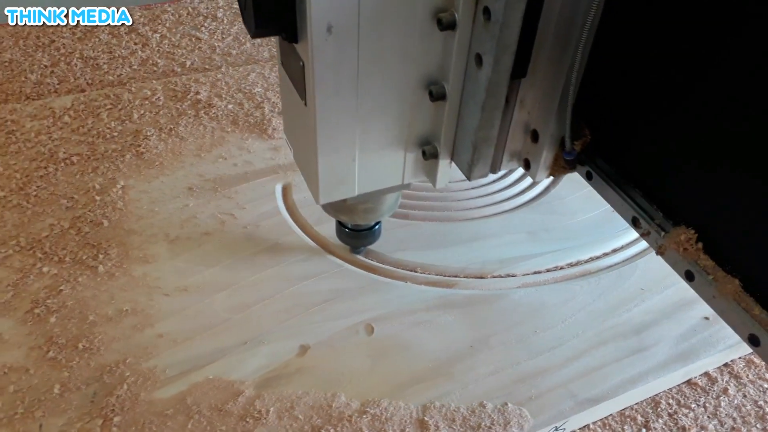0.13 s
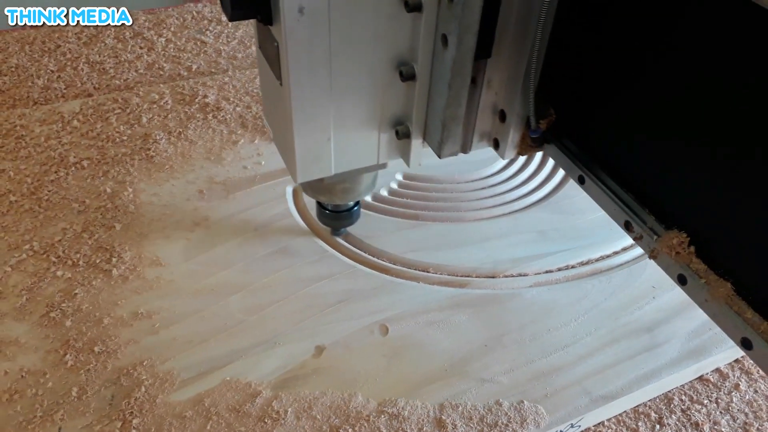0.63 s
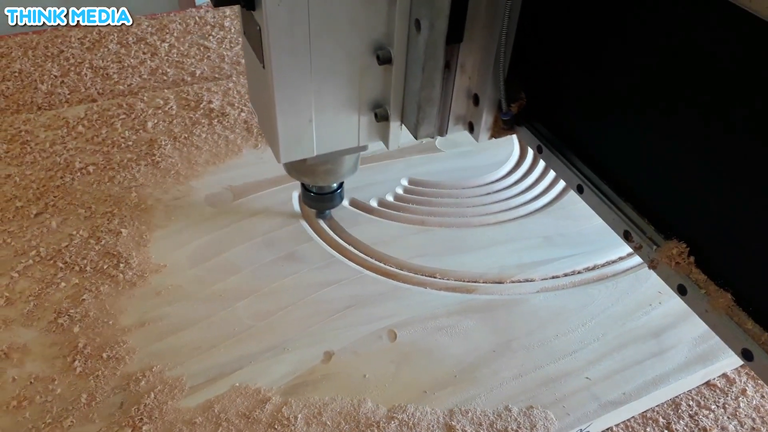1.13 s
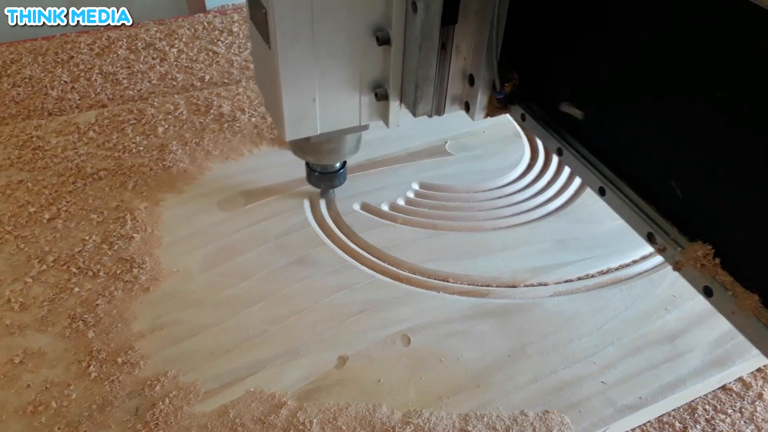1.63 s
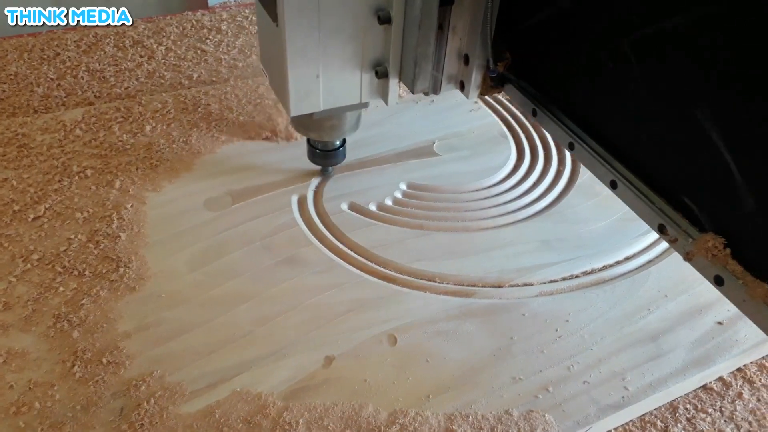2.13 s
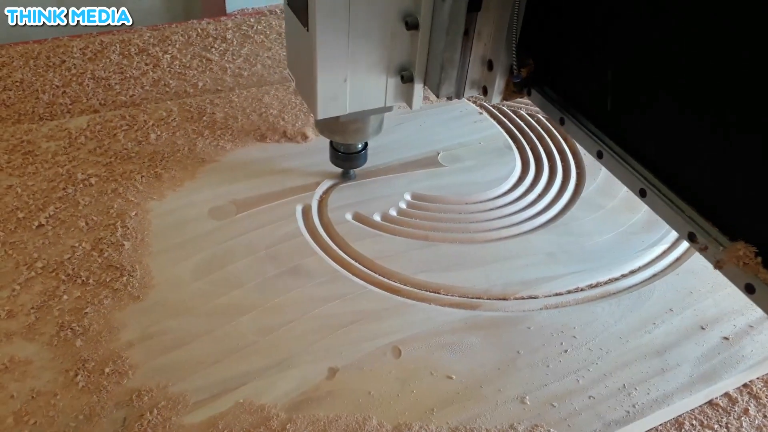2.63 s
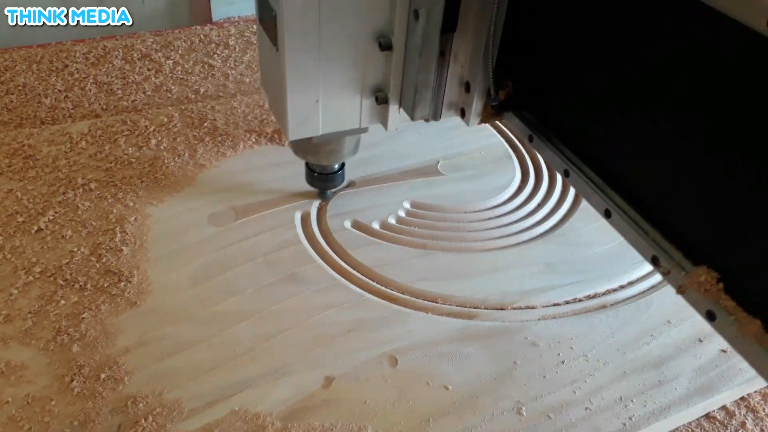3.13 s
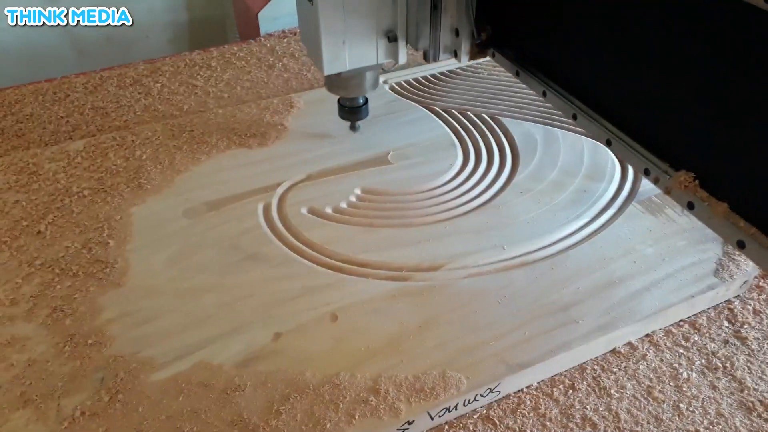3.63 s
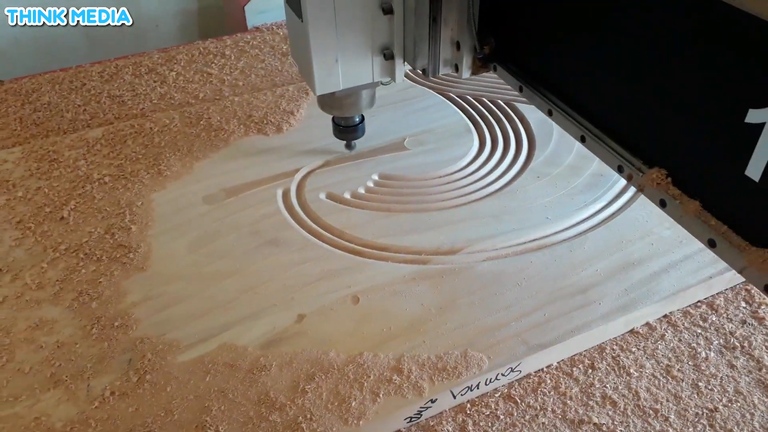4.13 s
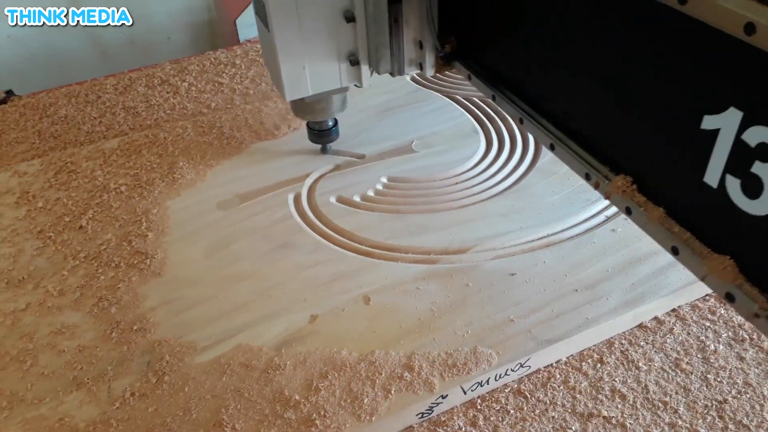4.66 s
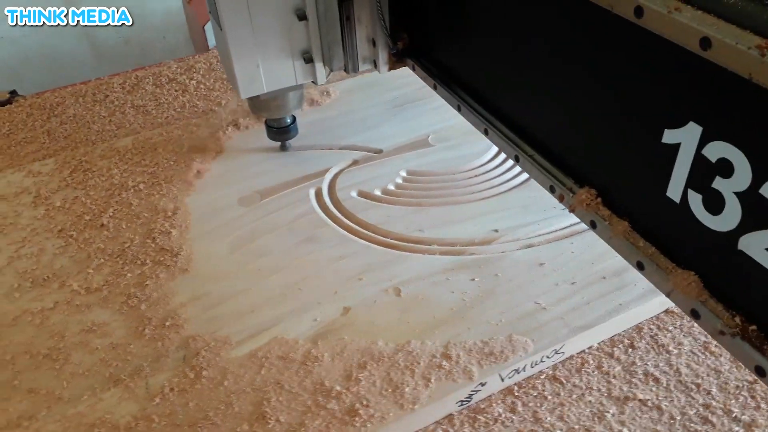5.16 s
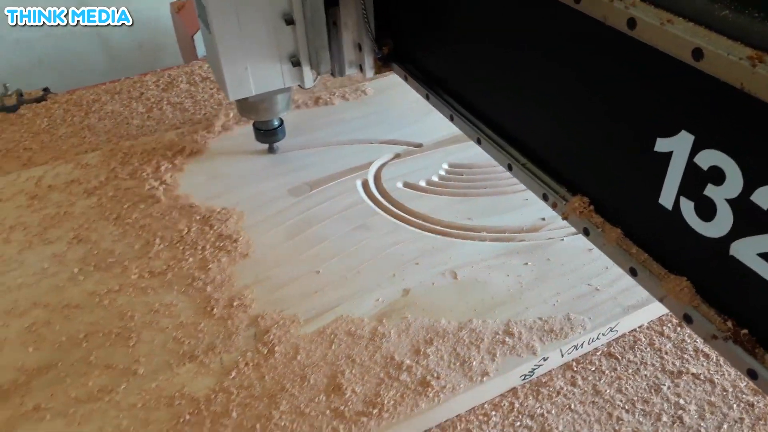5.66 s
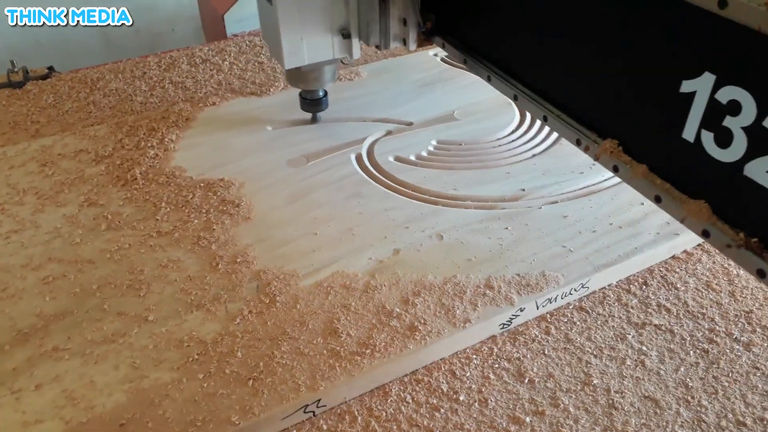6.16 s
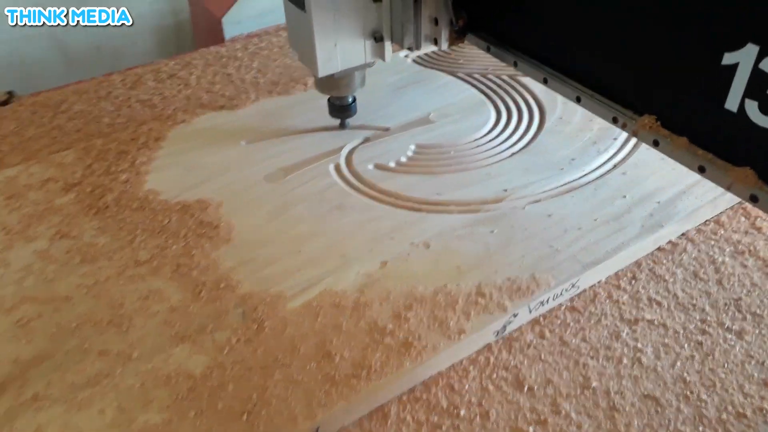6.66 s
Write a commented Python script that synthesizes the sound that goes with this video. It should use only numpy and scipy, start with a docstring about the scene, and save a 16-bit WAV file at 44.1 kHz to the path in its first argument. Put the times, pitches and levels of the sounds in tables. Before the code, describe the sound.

Close mono pickup, mildly distorted, of a high-speed cutting spindle. A piercing mid-pitched drone dominates bright air hiss and low shop rumble, flickering in level before dropping to a rougher buzz. Abruptly the view changes and the hiss swells with little cutting tone. The bit re-enters the wood with a sudden loud whine, which later sinks into wavering buzz and rising hiss.

```python
"""Router cutting a wooden panel

A router spindle turns near 300 times a second while its two-flute bit cuts grooves. Sines at whole multiples
of the shaft speed ("orders") sing over random noise for the cooling air and shop rumble, narrow noise hums
and a feed motor's thin tone. At 3.33 s the scene jumps to the lifted bit, seen from elsewhere, which then
plunges again. One microphone, lightly overloaded, hears it all; a band round the flute tone drops in steps."""
import sys
import numpy as np
from scipy import signal
from scipy.fft import rfft, irfft
from scipy.io import wavfile
from scipy.ndimage import uniform_filter1d

SR = 44100
rng = np.random.default_rng(int(sys.argv[2]) if len(sys.argv) > 2 else 0)


def persist_wave(psi):
    """Save psi, clipped to +-1, as 16-bit WAV."""
    counts = np.round(np.clip(psi, -1, 1) * 32767).astype(np.int16)
    wavfile.write(sys.argv[1], SR, np.atleast_2d(counts).T)


def ratio(d):
    """dB to gain"""
    e = np.asarray(d, float) / 20
    return 10 ** e


N = 298998
JUMP_S, PLUNGE_S = 3.33, 4.3

# colour of the air noise at the first place: (pitch [Hz], relative level per Hz [dB])
NEAR_COLOUR = [(20, -50), (40, -32), (70, -27), (120, -13), (200, -8), (330, -8), (490, -9.5), (700, -1.5),
               (1050, -10.5), (1550, -7.5), (2700, -9.5), (5000, -2.5), (8000, -7.5), (12500, -10.5),
               (15800, -14.5)]
# the same at the second place: (pitch [Hz], relative level per Hz [dB])
FAR_COLOUR = [(20, -45), (40, -24), (70, -17), (120, -8), (200, -5.5), (330, -4.5), (490, -10), (700, -1),
              (1050, -11.5), (1550, -7.5), (2700, -10.5), (5000, -1), (8000, -6.5), (12500, -10),
              (15800, -16)]
# resonances of housing and shop in that noise; lifts below zero count as none:
# (pitch [Hz], width [Hz], lift at the first place [dB], lift at the second [dB])
RESONANCES = [(234, 17, -1.5, 1), (720, 90, 1.5, 3.7), (880, 46, 1, 5.4), (1360, 150, 3.5, 1),
              (1520, 72, 4, 4.8), (1725, 40, -3, 3), (2200, 37, 4.5, 3.6), (2337, 125, 5, 5.6),
              (3000, 110, 2, 7.7), (3466, 160, 3.5, 5.4), (3950, 180, 7.5, 2.5), (4528, 224, 8, 6.6),
              (4940, 340, 6.5, 1.5), (5340, 220, 5, 6.1), (5860, 280, 4, 2.9), (6830, 340, 4, 2.1),
              (9030, 360, 2, 1.9)]
# level of the hiss, before its colour: (time [s], level [dB])
HISS = [(0, -18), (.5, -22), (1, -21), (1.3, -19.5), (2.2, -19), (2.41, -19.5), (2.44, -22.5), (2.6, -20),
        (2.9, -20), (3.325, -19), (3.335, -15.5), (3.7, -13.5), (4.0, -15.5), (4.3, -14.5), (4.4, -21),
        (4.6, -21.5), (5.05, -24.5), (5.55, -23), (5.75, -21), (6, -20.5), (6.25, -20), (6.78, -15)]
# deepest rumble, added to the hiss level: (time [s], level [dB])
DEEP_RUMBLE = [(0, 8), (.4, 1), (2.4, 1), (2.8, 4.5), (4.2, 2), (4.7, -1.5), (6.78, 1)]
# rough hums against the hiss level:
# (pitch [Hz], width [Hz], first cut [dB], bit lifted [dB], second cut [dB])
DRONES = [(243.6, 7.7, -40, -22.5, -37), (394, 40, -27, -29, -36), (718, 22, -26, -22, -29),
          (852, 40, -23, -25, -28), (2045, 33, -20, -25, -32), (3113, 34, -34, -24, -25),
          (3966, 35, -21, -19, -18), (4425, 52, -20, -15, -34), (4533, 52, -27, -18, -25),
          (4970, 40, -25, -21, -32), (5264, 110, -24, -9.5, -22), (5410, 70, -34, -21, -16.5),
          (5800, 36, -27, -27, -22), (7150, 24, -35, -22, -30), (9330, 63, -37, -20, -36),
          (9800, 50, -45, -34, -37)]
# the feed motor's thin tone: (time [s], rms level [dB])
FEED = [(0, -31), (.3, -37), (.6, -33), (1.2, -37.5), (1.5, -31), (1.7, -38), (2.4, -50)]
# the spindle speed sags under load: (time [s], speed [turns per second])
SHAFT = [(0.0, 298.0), (2.3, 298.08), (2.55, 298.98), (2.8, 299.33), (3.33, 299.4), (3.34, 299.8),
         (4.2, 299.8), (4.4, 298.02), (4.6, 298.7), (5.6, 298.4), (5.9, 299.06), (6.78, 299.05)]
# order 1, the shaft's unbalance: (time [s], rms level [dB])
UNBALANCE = [(0, -22.5), (.25, -23.5), (.8, -32), (1.15, -48), (1.45, -33.5), (2, -28.5), (2.3, -22),
             (2.62, -26), (2.85, -31.5), (3.3, -30.5), (4.17, -33), (4.2, -24.5), (4.31, -19), (4.35, -34),
             (4.45, -31), (4.5, -23), (4.54, -28), (4.6, -21), (4.655, -34), (4.7, -26), (4.85, -22.5),
             (5.35, -22.5), (5.68, -19), (5.8, -31.5), (6.05, -31.5), (6.55, -23.5), (6.78, -26)]
# order 2, one stroke a flute, which the panel radiates best: (time [s], rms level [dB])
FLUTES = [(0, -10.5), (.3, -7.5), (.68, -6.5), (1.75, -7), (1.95, -5.5), (2.4, -5), (2.54, -8.5),
          (2.67, -19), (2.9, -21), (2.97, -17.5), (3.325, -18), (3.335, -30), (3.43, -29), (3.5, -23),
          (3.58, -27), (3.66, -23), (3.85, -30), (4.17, -36), (4.19, -24), (4.25, -20), (4.31, -15.5),
          (4.345, -8), (4.39, -8.5), (4.42, -6), (4.97, -6.5), (5.28, -9), (5.62, -10), (5.72, -17),
          (5.78, -17.5), (5.84, -25), (5.9, -19.5), (6.14, -26), (6.4, -19.5), (6.55, -18), (6.62, -22),
          (6.7, -18.5)]
# order 4, first overtone of the flute tone: (time [s], rms level [dB])
OVERTONE = [(0, -20), (.2, -19), (.5, -22.5), (.8, -20.5), (1.25, -24), (1.58, -22.5), (1.66, -33),
            (1.9, -28), (2, -23.5), (2.15, -20), (2.55, -30.5), (2.6, -17), (3.1, -16.5), (3.325, -22.5),
            (3.335, -59), (4.2, -52), (4.26, -23), (4.3, -45), (4.33, -27.5), (4.5, -32), (4.58, -45),
            (4.65, -34), (4.7, -40), (5, -34.5), (5.6, -26), (5.75, -29.5), (5.9, -23), (6.15, -30),
            (6.35, -24.5), (6.6, -25), (6.7, -41), (6.78, -25)]
# order 6, second overtone of the flute tone: (time [s], rms level [dB])
SIXTH = [(0, -35), (1.55, -35.5), (1.66, -27.5), (1.85, -41), (2, -26), (2.15, -33), (2.43, -29),
         (2.55, -36), (2.61, -24.5), (2.75, -22.5), (3.05, -21), (3.325, -27), (3.335, -47), (4.2, -47),
         (4.33, -40), (4.85, -42), (5.12, -32), (5.32, -36), (5.6, -30), (5.7, -38), (5.82, -24),
         (5.92, -24), (6.2, -32), (6.35, -27), (6.55, -31), (6.7, -17.5), (6.78, -23)]
# the weaker orders take on a new colour at each new stretch of panel, before the lift of BITE:
# (start [s], rms levels of orders 3, 5, 7, 8, 9, 10, 11, 12 [dB])
STRETCHES = [(0, [-35, -30.5, -32, -40, -47, -35.5, -45, -35]),
             (.7, [-37, -29, -36, -42, -50, -44, -50, -41]),
             (1.36, [-26.5, -32, -38.5, -39, -40, -41, -40, -41]),
             (1.62, [-27, -26.5, -27, -31, -38, -39.5, -48, -36]),
             (2.1, [-25.5, -27.5, -45, -35, -37, -34, -48, -37]),
             (2.4, [-30, -34, -45, -32, -47, -40, -50, -42]),
             (2.59, [-34, -32, -29.5, -27.5, -28.5, -33, -38, -35]),
             (2.84, [-36, -34.5, -32.5, -25, -30, -43, -33, -27]),
             (3.33, [-50, -50, -49, -51, -54, -38, -48, -48]),
             (4.22, [-36, -38, -44, -43, -42, -39, -46, -44]),
             (4.45, [-34, -45, -36, -48, -56, -44, -44, -48]),
             (4.75, [-33, -37.5, -29, -39, -42, -48, -36, -42]),
             (5.2, [-29.5, -30.5, -31, -46, -41, -37.5, -48, -44]),
             (5.75, [-31, -40.5, -39.5, -38, -37.5, -40, -40, -52]),
             (6.26, [-29.5, -35.5, -32, -27.5, -48, -35, -36, -36]),
             (6.64, [-27, -26, -26, -25, -35, -34, -35, -33])]
# changes of colour where the bit meets an edge: time [s]
EDGE_CHANGES = [1.62, 2.59, 5.75]
# the weaker orders rise together as the bit bites harder: (time [s], lift [dB])
BITE = [(0, 1), (.4, -6), (.8, 2), (1.15, -5), (1.45, 3.5), (1.6, -1), (2.0, 0), (2.3, -1), (2.55, -3),
        (2.7, -2.5), (3.05, 0.5), (3.3, 0.5), (4.3, 2), (4.5, -3), (4.9, -0.5), (5.2, -3), (5.55, 1.5),
        (5.71, -4.5), (5.9, 2), (6.2, 2.5), (6.5, 1.5), (6.78, 0)]
# two orders that the housing lifts: (time [s], rms level of order 18 [dB], of order 24 [dB])
WHINE = [(0, -40, -45), (.9, -44, -34), (1.3, -30, -43), (1.6, -39, -50), (2.9, -30.5, -41),
         (3.325, -34, -46), (3.335, -44, -36), (4.2, -47, -46.5), (4.5, -46, -52), (5.6, -52, -52),
         (6.05, -29, -38), (6.35, -26.5, -41), (6.6, -26, -35), (6.78, -30, -33)]
# high orders that follow order 12: (order [number], level against order 12 [dB])
FOLLOW_12 = [(13, -2.5), (14, -0.5), (15, -13), (16, -5), (17, -9), (19, -12)]
# orders that follow order 18: (order [number], level against order 18 [dB])
FOLLOW_18 = [(20, -7), (22, -9)]
# three sizes of sudden drop in the band round the flute tone: (depth at the middle [dB], half width [Hz],
# lean of the click towards low pitch [ratio], upper, lower side tone against what is taken away [dB])
STEPS = [(-4, 66, 3, -13, -23), (-6, 160, -0.8, -28, -37), (-20.5, 110, -1.7, -47, -31)]
# when the band drops: (start [s], end [s], row of STEPS [number])
DIPS = [(.690, .736, 0), (.772, 2.418, 0), (1.205, 1.213, 1), (1.233, 1.259, 2), (1.332, 1.589, 2),
        (1.944, 2.007, 2), (2.015, 2.024, 1), (2.035, 2.043, 2), (2.094, 2.102, 2)]


def evened(x):
    """Scales a signal to rms 1."""
    return x / np.sqrt(np.mean(x ** 2) + 1e-20)


def read_colour(points, hz):
    """Reads a colour table along a logarithmic pitch axis."""
    f, level_db = np.transpose(points)
    return np.interp(np.log(hz + 1), np.log(f + 1), level_db)


def follow(table, t):
    """Reads each column of a time table at the times t."""
    times, *values = np.transpose(table)
    return [np.interp(t, times, column) for column in values]


def wobble(count, width_hz):
    """Makes rows of slow random motion, rms 1, by smoothing random steps."""
    step = 64  # samples
    keep = np.exp(-2 * np.pi * width_hz * step / SR)
    slow = signal.lfilter([1], [1, -keep], rng.standard_normal((count, N // step + 2)))
    return [np.interp(np.arange(N) / step, np.arange(len(row)), evened(row)) for row in slow]


def air_levels(t, hz):
    """The low roar and the top follow the hiss only in part; the deepest rumble has its own course."""
    [hiss_db], [rumble_db] = follow(HISS, t), follow(DEEP_RUMBLE, t)
    above_usual_db = hiss_db + 20  # the usual hiss is -20 dB
    roar_db = 1.86 - 0.53 * above_usual_db
    top_db = -3.5 - 0.3 * above_usual_db
    field_db = hiss_db + rumble_db / (1 + (hz / 180) ** 4)
    field_db = field_db + roar_db / (1 + (hz / 1800) ** 2)
    return field_db + top_db / (1 + (9000 / (hz + 1)) ** 4)


def air(patchy_db=0.5, ripple_db=1.9, gust_db=0.5, throb_db=0.48, throb_hz=28.6):
    """Cooling air and rumble: coloured noise with patches, and ripples, gusts and a throb in the treble."""
    size, overlap, hop = 512, 384, 128  # samples
    frames, hz = N // hop + 5, np.fft.rfftfreq(size, 1 / SR)[:, None]
    a, b, patches, ripples = rng.standard_normal((frames, 257, 4)).T
    t = np.arange(frames) * hop / SR
    patches = evened(uniform_filter1d(uniform_filter1d(patches, size=6, axis=0), size=20, axis=1))
    # fine random ripples across the treble, drifting slowly
    ripples = evened(uniform_filter1d(uniform_filter1d(ripples, size=2, axis=0), size=250, axis=1))
    gusts = evened(uniform_filter1d(rng.standard_normal(frames), size=8))
    throb = np.sin(2 * np.pi * throb_hz * t) + .7 * np.sin(4 * np.pi * throb_hz * t)
    treble = hz / (hz + 4000)
    field_db = air_levels(t, hz) + patchy_db * patches
    field_db = field_db + treble * (ripple_db * ripples + gust_db * gusts + throb_db * throb)

    noise = evened(signal.istft(a + 1j * b, nperseg=size, noverlap=overlap)[1])
    spectra = signal.stft(noise, nperseg=size, noverlap=overlap)[2][:, :frames]
    shaped = signal.istft(spectra * ratio(field_db), nperseg=size, noverlap=overlap)[1][:N]

    fine_hz = np.fft.rfftfreq(N, 1 / SR)
    rings_db = 0
    for f, width_hz, *lifts_db in RESONANCES:
        peak = 1 / (1 + (2 * (fine_hz - f) / width_hz) ** 2)
        rings_db = rings_db + np.outer(np.maximum(lifts_db, 0), peak)
    places = []
    for colour, ring_db in zip((NEAR_COLOUR, FAR_COLOUR), rings_db):
        gain = ratio(read_colour(colour, fine_hz) + ring_db + 7.5)
        places.append(irfft(rfft(shaped) * gain, N))
    return np.where(np.arange(N) < JUMP_S * SR, *places)


def drones():
    """Narrow bands of noise: hollow parts of the machine and shop hum roughly on their own pitch."""
    t, hz = np.arange(N) / SR, np.fft.rfftfreq(N, 1 / SR)
    [hiss_db] = follow(HISS, t)
    stage_times = [JUMP_S, JUMP_S, PLUNGE_S, PLUNGE_S + 0.18]
    out = np.zeros(N)
    for f, width_hz, first_db, lifted_db, second_db in DRONES:
        peak = 1 / (1 + (2 * (hz - f) / width_hz) ** 2)
        band = evened(irfft(rfft(rng.standard_normal(N)) * peak, N))
        stage_db = np.interp(t, stage_times, [first_db, lifted_db, lifted_db, second_db])
        out += ratio(hiss_db + stage_db) * band
    return out


def feed(hz=1278.5):
    """The feed motor: one sine of steady pitch whose level follows FEED and stops at its end."""
    t = np.arange(N) / SR
    [level_db] = follow(FEED, t)
    running = t < FEED[-1][0]
    return np.sqrt(2) * ratio(level_db) * running * np.sin(2 * np.pi * hz * t)


def upper_orders(t):
    """Each stretch's colour blends into the next (almost at once at the jump), all lifted by the bite."""
    blend_s, edge_blend_s = 0.23, 0.055
    starts = np.array([s for s, _ in STRETCHES[1:]])
    at_edge = abs(starts[:, None] - np.array(EDGE_CHANGES)).min(axis=1) < .04
    usual_s = np.minimum(blend_s, np.diff(starts, prepend=0))
    half_s = np.where(at_edge, edge_blend_s, usual_s) / 2
    half_s[abs(starts - JUMP_S) < .04] = .005
    # each blend has a start and an end, so each colour is held between two corners
    corners = np.ravel([starts - half_s, starts + half_s], "F")
    colours = np.repeat([db for _, db in STRETCHES], 2, axis=0)[1:-1]
    [bite_db] = follow(BITE, t)
    return [np.interp(t, corners, db) + bite_db for db in colours.T]


def cutter(shake_db=1.0, shake_rad=0.041):
    """Shaft orders as sines; uneven wood shakes each one's level and phase, the high ones more.

    The two shakes are rms values for order 4."""
    t = np.arange(N) / SR
    upper, whine = upper_orders(t), follow(WHINE, t)
    levels = [follow(table, t)[0] for table in (UNBALANCE, FLUTES, OVERTONE, SIXTH)]
    levels += upper + whine
    levels += [upper[-1] + db for _, db in FOLLOW_12]
    levels += [whine[0] + db for _, db in FOLLOW_18]
    orders = [1, 2, 4, 6, 3, 5, *range(7, 13), 18, 24]  # same sequence as the levels
    orders += [round(k) for k, _ in [*FOLLOW_12, *FOLLOW_18]]

    turn = 2 * np.pi * np.cumsum(follow(SHAFT, t)[0]) / SR  # shaft angle in radians
    level_shakes = wobble(count=len(orders), width_hz=9.0)
    phase_shakes = wobble(count=len(orders), width_hz=5)
    starts = rng.random(len(orders))
    out = np.zeros(N)
    for k, db, level_shake, phase_shake, start in zip(orders, levels, level_shakes, phase_shakes, starts):
        loose = .3 if k == 2 else np.sqrt(k / 4)  # the flute tone is the steadiest
        phase = k * turn + loose * shake_rad * phase_shake + 2 * np.pi * start
        out += ratio(db + loose * shake_db * level_shake) * np.sin(phase)
    return np.sqrt(2) * out


def scene():
    """Adds all the sources at one microphone, the same on both channels."""
    mono = air() + drones() + feed() + cutter()
    return np.array([mono, mono])


def dipped(x):
    """Each step takes away part of the band round the flute tone and leaves side tones of what it took."""
    middle_hz, side_hz, faint_side_db, edge_s = 597, 187.5, -31, .004
    start, end = round(.5 * SR), round(2.6 * SR)
    part, t = x[start:end], np.arange(start, end) / SR
    hz, shift = np.fft.fftfreq(len(t), 1 / SR), np.exp(2j * np.pi * side_hz * t)
    for s0, s1, size in DIPS:
        depth_db, half_hz, lean, upper_db, lower_db = STEPS[size]
        window = np.exp(-((hz - middle_hz) / half_hz) ** 2)
        band = 2 * np.fft.ifft(np.fft.fft(part) * window)
        on = np.clip(np.minimum(t - s0, s1 - t) / edge_s + .5, 0, 1)
        on = uniform_filter1d(on, size=60)
        # a phase kick tips the switching click low or high
        jolt = 1j * lean * np.gradient(on) * SR * edge_s / np.pi
        taken = (on + jolt) * (1 - ratio(depth_db)) * band
        sides = ratio(upper_db) * shift + ratio(lower_db) / shift
        sides = sides + ratio(faint_side_db) / shift ** 2  # a fainter one, twice as far below
        part = part - (taken - taken * sides).real
    return np.concatenate([x[:start], part, x[end:]])


def overloaded(x, knee=.8):
    """Rounds off peaks above the knee, so they lean towards full scale."""
    over, room = np.maximum(abs(x) - knee, 0), 1 - knee
    return x - np.sign(x) * (over - room * np.tanh(over / room))


def band_limited(x, edge_hz=15750):
    """Removes all pitches from the edge upwards."""
    return irfft(rfft(x) * (np.fft.rfftfreq(N, 1 / SR) < edge_hz), N)


def roll_off(x):
    """The treble ends steeply here."""
    return signal.sosfilt(signal.butter(12, 15910, fs=SR, output="sos"), x)


def record(dry):
    """Band steps, then peaks rounded off near full scale, then the band limit."""
    mono = overloaded(dipped(dry[0]))
    mono = np.clip(band_limited(mono), -1, 1)
    mix = np.array([mono, mono])
    return roll_off(mix)


dry = scene()
out = record(dry)
persist_wave(out)
```